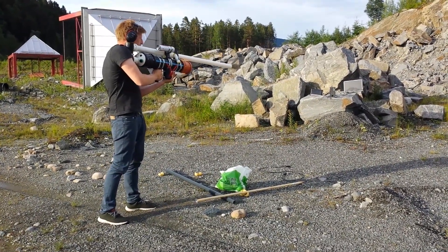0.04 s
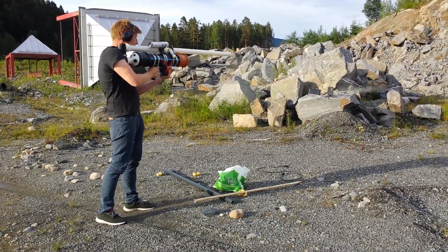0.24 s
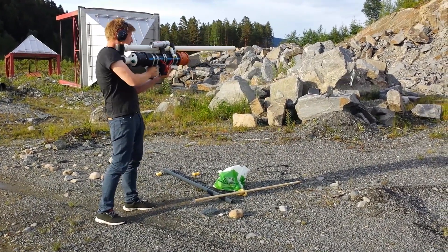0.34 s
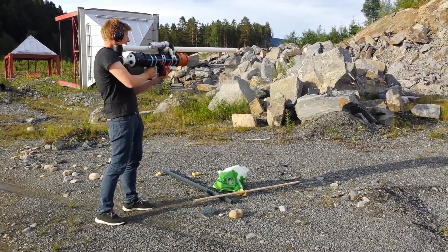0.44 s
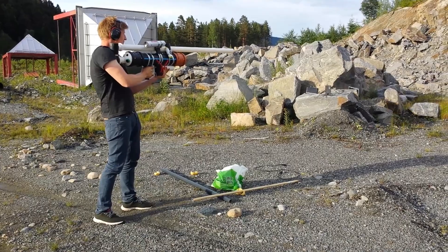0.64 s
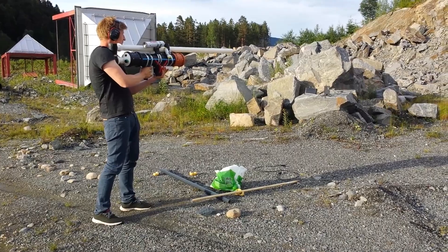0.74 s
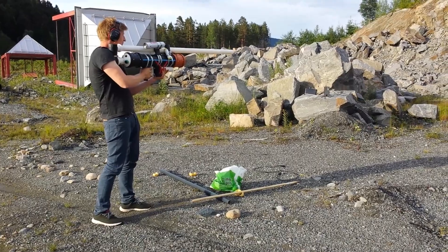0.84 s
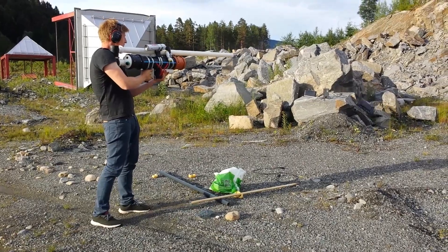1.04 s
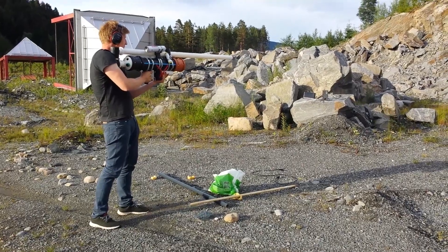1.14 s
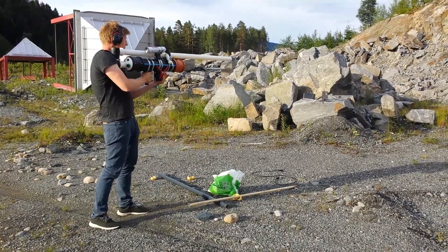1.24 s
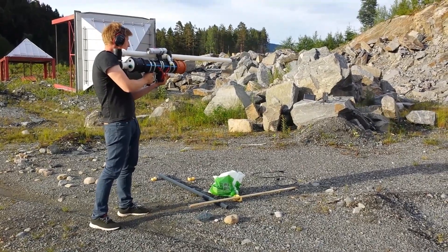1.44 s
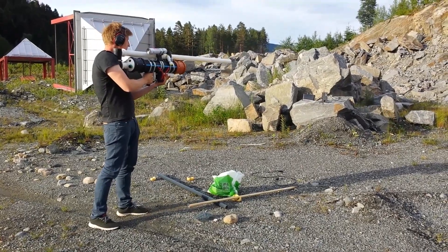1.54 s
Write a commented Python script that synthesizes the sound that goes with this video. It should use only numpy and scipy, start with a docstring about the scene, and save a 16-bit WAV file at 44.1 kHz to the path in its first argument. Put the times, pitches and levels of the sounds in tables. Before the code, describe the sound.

An air cannon fires one loud pop outdoors, followed by echoes and knocks on stone.

```python
"""A shoulder-held air cannon fires once in a gravel quarry, a few metres from the microphone.
First comes faint outdoor air and a tiny click. The valve spits, and at 0.2 s the blast overloads
the microphone. The barrel rings and chuffs twice more as it empties, and rock piles throw the
shot back. From about 0.5 s come sharp cracks on stone, then crunching knocks on gravel."""
import sys
import numpy as np
from scipy import signal
from scipy.fft import rfft, irfft
from scipy.io import wavfile
from scipy.ndimage import uniform_filter1d

SR = 44100
rng = np.random.default_rng(int(sys.argv[2]) if len(sys.argv) > 2 else 0)


def master_out(mix):
    """Clip the mix to full scale and print it as 16-bit PCM to the path in sys.argv[1]."""
    frames = np.transpose(np.atleast_2d(mix))
    ceiling = np.clip(frames, -1, 1)
    pcm = np.round(ceiling * 32767).astype(np.int16)
    wavfile.write(sys.argv[1], SR, pcm)


N = 70560
T = np.arange(N) / SR
HZ = np.maximum(np.arange(N // 2 + 1) * SR / N, 1)


def amp(db):
    """Turn decibels into a number to multiply by."""
    return 10 ** (np.asarray(db) / 20)


def unit(x):
    """Scale a sound to an average (rms) size of 1."""
    return x / np.sqrt(np.mean(x ** 2))


def placed(db, pan_db):
    """Left and right gains; pan is how much louder the left side is."""
    return amp(db + np.array([[pan_db], [-pan_db]]) / 2)


def curve(points):
    """Join (frequency, value) points into a line across all pitches."""
    hz, value = np.array(points, float).T
    return np.interp(np.log(HZ), np.log(hz), value)


def colour(x, db):
    """Turn each frequency of a sound up or down."""
    return irfft(rfft(x) * amp(db), N)


def tilt(db_per_octave):
    """A slope that brightens (+) or dulls (-) a sound above about 400 Hz."""
    return db_per_octave * np.log2(1 + HZ / 400)


def hump(hz, width):
    """A rounded peak around one pitch, in dB; width is in octaves."""
    distance = np.log2(HZ / hz) / width
    return -20 * np.log10(1 + distance ** 4 + distance ** 2 / 2)


def bass_cut(hz):
    """A slope in dB that fades everything below hz."""
    return -10 * np.log10(1 + (hz / HZ) ** 4)


def grains(db, seconds=.0006):
    """A loudness that jumps at random from grain to grain, making noise rough."""
    size = max(int(seconds * SR), 1)
    gains = amp(db * rng.standard_normal(N)[:N // size + 1])
    return uniform_filter1d(np.repeat(gains, size), size)[:N]


def envelope(start, rise, hold, fade):
    """Swell, stay, die away; fade is the time taken to drop by 60 dB."""
    return np.clip((T - start) / rise, 0, 1) * amp(-60 * np.maximum(T - start - rise - hold, 0) / fade)


def ring(start, hz, fade):
    """One struck, fading tone; high tones reach left and right out of step."""
    phase = 2 * np.pi * (rng.random() + rng.random((2, 1)) * min(hz / 3000, 1))
    return envelope(start, .0005, 0, fade) * np.sin(2 * np.pi * hz * T + phase)


# How alike left and right sound: f/Hz, likeness (0 is unrelated, 1 or more is almost the same)
LIKENESS = [(50, -0.2), (140, 4.1), (300, 0.77), (600, 1.27), (1200, -0.25), (3000, 0.2), (8000, 0)]
def noise(db, grain=1, likeness=LIKENESS):
    """Stereo hiss with the tone given by a dB curve."""
    alike = np.clip(curve(likeness), -.99, .99)
    mid, side = rfft(rng.standard_normal((2, N)) * grain)
    mid, side = mid * np.sqrt(1 + alike), side * np.sqrt(1 - alike)
    return unit(irfft(np.array([mid + side, mid - side]) * amp(db), N))


# Tone of the open air: f/Hz, relative level/dB
AIR_TONE = [(20, -22.5), (35, -12), (70, -13), (160, -27), (350, -23.5), (600, -28.5), (1200, -16),
            (1900, -16.5), (3300, -31.5), (13000, -34), (14600, -40.5)]
def outdoor_air():
    """A faint, steady hush lies under everything."""
    return amp(-62) * noise(curve(AIR_TONE))


# Clicks and cracks: t/s, level/dB, hold/s, fade/s, tilt/(dB per octave), pan/dB
CRACKS = [(0.0824, -58.5, .001, .03, -5.5, -2), (.4845, -19.5, 0.0048, 0.015, 1.5, 9),
          (0.497, -36.5, 0.0027, 0.13, 0, 19.5), (0.6134, -22.5, 0.0021, 0.028, 3, -1.5),
          (0.638, -39.5, 0.0024, 0.043, -.5, 5), (0.861, -45, 0.00074, 0.037, 7, -9),
          (0.957, -43.5, 0.0064, 0.058, -2, 1), (0.977, -38, 0.0014, 0.065, 1.5, -1)]
# Tone of the snap: f/Hz, relative level/dB
SNAP_TONE = [(100, -12), (400, -9), (900, -4.5), (1600, 1), (2150, -2), (2850, 0), (3800, -4.5),
             (4600, -3.5), (5600, 2.5), (6800, -5.5), (7300, -2.5), (7900, 1), (10300, -3.5), (12000, -19),
             (14000, -22)]
# Tones that ring after it: f/Hz, relative level/dB, fade/s
CRACK_RINGS = [(1680, -9, .06), (2780, -10, .06), (3500, -15, .045), (5160, -10, .04), (5700, -6, .035),
               (6560, -9, .035), (7930, -10, .03), (9040, -12, .02), (10080, -11, .025)]
def cracks():
    """A faint click comes first, then hard hits on stone; each snaps, then rings briefly in a slightly
    different way."""
    rise_s, spread_db = .0013, 1
    out = 0
    for start, db, hold, fade, slope, pan in CRACKS:
        snap = envelope(start, rise_s, hold, fade) * noise(curve(SNAP_TONE) + tilt(slope))
        rings = 0
        for hz, ring_db, ring_fade in CRACK_RINGS:
            struck_db = ring_db + slope * np.log2(hz / 5000) - spread_db * rng.standard_normal()
            rings += amp(struck_db) * ring(start + rise_s, hz, ring_fade)
        out += placed(db, pan) * (snap + rings)
    return out


# Spits of the opening valve: t/s, level/dB, rise/s, fade/s, tilt/(dB per octave)
SPITS = [(0.1621, -38.5, .0005, 0.079, 4), (0.171, -32, 0.0026, 0.044, -2.5),
         (0.18, -31, .0005, 0.09, 10.5), (0.187, -21.5, 0.0063, 0.087, -3.4),
         (0.2049, -12, 0.00085, 0.015, 0)]
# Tone of rushing air, here and at the muzzle: f/Hz, relative level/dB
JET_TONE = [(250, -8), (450, -6), (900, -4), (1400, -1), (1900, -6.5), (2400, -5.5), (3700, -4.5),
            (4600, -9), (5400, -2.5), (6600, -6.5), (8500, -2.5), (11500, -9.5), (13700, -12),
            (14600, -23.5)]
def valve():
    """The valve clicks and air spits past the potato in the barrel."""
    tone = curve(JET_TONE) + hump(2000, 5.7)
    return sum(amp(db) * envelope(start, rise, 0, fade) * noise(tone + tilt(slope))
               for start, db, rise, fade, slope in SPITS)


# Shoves of air on the microphone: t/s, level/dB, rise/s, fade/s
GUSTS = [(.186, -38.5, 0.0072, .1), (0.206, -19.5, 0.0052, .09)]
def gusts():
    """The pressure wave hits each side of the microphone separately, making a low flutter."""
    out = 0
    for start, db, rise, fade in GUSTS:
        flutter = unit(colour(rng.standard_normal((2, N)), hump(hz=90, width=1.1)))
        out += amp(db) * envelope(start, rise, 0, fade) * flutter
    return out


# Surges of escaping air: t/s, level/dB, hold/s, fade/s, tilt/(dB per octave), pan/dB
SURGES = [(0.2069, 2, 0.0037, 0.072, 0.5, 2), (0.228, -13, 0.018, 0.16, -.5, 4),
          (0.258, -9, 0.0091, 0.039, -0.77, -3.5), (.296, -22.5, 0.017, 0.18, -1.2, -2.5),
          (0.3171, -16, 0.0085, 0.019, 0.9, -1.5)]
# Low puffs: t/s, level/dB, hold/s, fade/s, f/Hz
PUFFS = [(0.188, -32, 0.0054, 0.032, 407), (0.206, -18.5, 0.0085, 0.057, 229.4),
         (0.242, -22, 0.021, 0.075, 190), (0.282, -23, 0.034, 0.15, 295)]
def muzzle():
    """Swirling air bounces along the barrel and bursts out, with low puffs from the air inside."""
    round_trip_s, reflection = .0069, .15
    tube = -20 * np.log10(abs(1 + reflection * np.exp(-2j * np.pi * HZ * round_trip_s)))
    jet = curve(JET_TONE) + tube + bass_cut(200)
    out = 0
    for start, db, hold, fade, slope, pan in SURGES:
        hiss = noise(jet + tilt(slope), grains(db=3))
        out += placed(db, pan) * envelope(start, .0005, hold, fade) * hiss
    for start, db, hold, fade, hz in PUFFS:
        out += amp(db) * envelope(start, .0038, hold, fade) * noise(hump(hz, width=.77))
    return out


# Tones of the barrel and air chamber: f/Hz, relative level/dB, fade/s
BARREL_RINGS = [(142, -32, .25), (192, -27, .25), (238, -29, .25), (330, -30, .3), (394, -27, .3),
                (845, -23, .25), (962, -24, .25), (1277, -22, .25), (1429, -21, .25), (3529, -20, .18),
                (5230, -18, .16), (5782, -18, .18), (8118, -21, .16), (8957, -21, .16)]
def barrel():
    """The first surge of the blast sets the tube ringing."""
    blast_s = SURGES[0][0]
    return sum(amp(db - .5) * ring(blast_s, hz, fade) for hz, db, fade in BARREL_RINGS)


# Rolls of bass: t/s, level/dB, rise/s, hold/s, fade/s, f/Hz, width/octaves
RUMBLES = [(0.23, -40.5, 0.014, 0.191, 0.37, 89, 0.76), (0.458, -51, 0.023, 0.052, 0.53, 262, 0.51),
           (0.916, -63, 0.045, 0.34, 0.94, 331.7, 0.56)]
def rumble():
    """The bass of the shot rolls back from the rock piles."""
    return sum(amp(db) * envelope(start, rise, hold, fade) * noise(hump(hz, width))
               for start, db, rise, hold, fade, hz, width in RUMBLES)


# Echoes: t/s after the shot, level/dB before dulling, rise/s, hold/s, fade/s, tilt/(dB per octave)
ECHOES = [(0.04, -17, 0.029, .02, .5, -2.5), (0.137, -14.5, 0.024, 0.033, .25, -0.5),
          (0.269, -26.5, 0.038, .08, 1.1, 1.3), (0.728, -36, 0.043, 0.12, 2.2, 0)]
# Their tone: f/Hz, relative level/dB
ECHO_TONE = [(50, -1), (100, 3), (150, -6.5), (230, -6.5), (350, -5), (560, -0.5), (900, 0), (2000, 1),
             (3000, 3.5), (8000, 3), (14000, -2.5)]
# The side they lean to: f/Hz, pan/dB
ECHO_PAN = [(1000, -0.5), (5500, -2.5), (8000, 3.5), (12000, -3.5)]
def echoes(shot):
    """Countless rock faces scatter the shot back; the air dulls the late echoes."""
    response = 0  # how the quarry would answer a single click
    for delay, db, rise, hold, fade, slope in ECHOES:
        scatter = noise(curve(ECHO_TONE) + tilt(slope), grains(db=4.5))
        response += amp(db) * unit(envelope(delay, rise, hold, fade) * scatter) / np.sqrt(N)
    hz, t, frames = signal.stft(response, SR, nperseg=256)
    air_loss_db = 5.5 * np.outer(hz / 1000, t)  # higher and later sound loses more
    dulled = signal.istft(frames * amp(-air_loss_db), SR)[1][:, :N]
    lean = curve(ECHO_PAN) / 2
    return signal.fftconvolve(shot, colour(dulled, np.array([lean, -lean])), axes=1)[:, :N]


# Crunches: t/s, level/dB, rise/s, hold/s, fade/s, tilt/(dB per octave)
CRUNCHES = [(0.672, -44, 0.014, 0.0035, 0.055, 0), (.728, -34, 0.0081, 0.0037, 0.17, 1.5),
            (0.77, -32, 0.0081, 0.0083, 0.21, 3), (0.932, -48, 0.013, .004, 0.096, -3),
            (1.003, -43, 0.013, 0.011, 0.096, 0.3), (1.116, -48.5, 0.011, 0.0085, 0.14, 2.8),
            (1.178, -50, 0.0032, 0.0025, 0.06, 3.5), (1.205, -34.5, 0.017, .004, 0.1, 2),
            (1.233, -34, 0.0023, 0.011, 0.083, 3.4), (1.401, -28.5, 0.0052, .006, 0.056, 6),
            (1.412, -29.5, 0.00077, 0.0034, 0.085, 4.4), (1.426, -33.5, 0.0011, 0.0052, .2, 2.5),
            (1.536, -47.5, .005, 0.008, 0.16, 0.5), (1.572, -47, 0.0041, 0.0082, .15, 1.4)]
# Tone of the small stones: f/Hz, relative level/dB
GRAVEL_TONE = [(88, -29.5), (150, -1.5), (465, -3.5), (608, -9), (1120, 0), (1810, -10), (2030, -1.5),
               (2330, -12.5), (2660, -1), (3040, -8), (3410, -2.5), (4290, -7), (5950, -7), (9980, -9.5),
               (14600, -25.5)]
# Knocks and clacks under them: t/s, level/dB, fade/s, f/Hz, width/octaves
KNOCKS = [(0.6405, -38.5, 0.024, 397, 0.37), (0.736, -44, .12, 186, 0.39), (0.78, -28.5, 0.1, 1065, 0.52),
          (0.784, -46.5, 0.27, 200, 2.1), (1.014, -54, 0.24, 291, .5), (1.216, -50.5, 0.32, 213, 0.64),
          (1.237, -46.5, 0.058, 803, 0.92), (1.411, -25.5, 0.039, 3200, 0.54),
          (1.432, -32.5, 0.028, 670, 0.87), (1.426, -49.5, 0.31, 149, 1.1), (1.547, -50, 0.12, 306, .5)]
# How alike left and right are for nearby sounds: f/Hz, likeness
NEARBY = [(60, 1), (400, 0.89), (1200, 0.39), (3500, 0.48), (7000, 0), (12000, 0.12)]
def gravel():
    """Tiny stones click in bursts over knocks on the ground and a light, slowly fading rustle."""
    stones = curve(GRAVEL_TONE) + bass_cut(90)
    out = 0
    for start, db, rise, hold, fade, slope in CRUNCHES:
        clicks = noise(stones + tilt(slope), grains(db=3.8), NEARBY)
        out += amp(db) * envelope(start, rise, hold, fade) * clicks
    for start, db, fade, hz, width in KNOCKS:
        out += amp(db) * envelope(start, .0024, 0, fade) * noise(hump(hz, width), likeness=NEARBY)
    settling = envelope(start=.704, rise=.022, hold=0, fade=10) * grains(db=1.2, seconds=.025)
    rustle = amp(-55.5) * settling * noise(stones, likeness=NEARBY)
    return out + rustle


def scene():
    """The shot, hollowed by its bounce off the ground, joins its echoes, the stones and the air."""
    shot = valve() + muzzle() + barrel()
    ground_dip_db = -19 * amp(hump(hz=589, width=.24))
    direct = colour(shot, ground_dip_db)
    return direct + gusts() + echoes(shot) + rumble() + cracks() + gravel() + outdoor_air()


# The side of the microphone that hears each pitch louder: f/Hz, pan/dB
MIC_PAN = [(200, 0), (700, 1), (2000, 2.5), (4000, 3), (5500, 5.5), (7000, -6), (8500, -17), (10500, -18.5),
           (12000, -15), (14000, -20.5)]
def record(dry):
    """Each side of the microphone has its own tone; the blast overloads it and the top treble is cut."""
    lean = curve(MIC_PAN)
    keep_power_db = -10 * np.log10((amp(lean) + amp(-lean)) / 2)
    heard = colour(dry, np.array([lean, -lean]) / 2 + keep_power_db)
    overloaded = np.clip(heard, -.86, .86)
    treble_cut = signal.ellip(10, .2, 70, 14700, fs=SR, output="sos")
    return signal.sosfilt(treble_cut, overloaded)


dry = scene()
out = record(dry)
master_out(out)
```